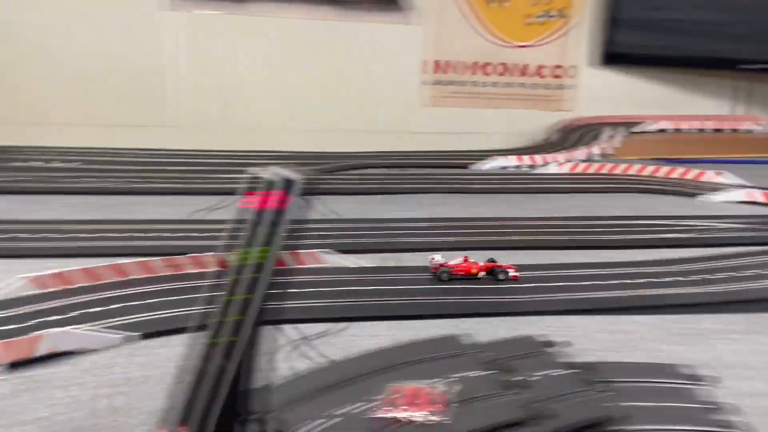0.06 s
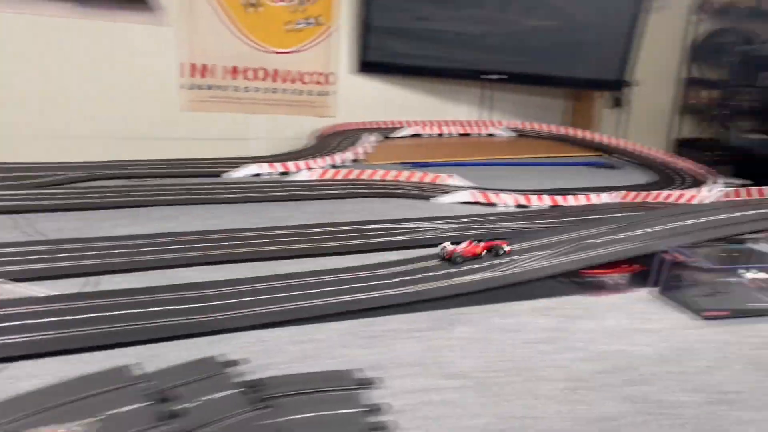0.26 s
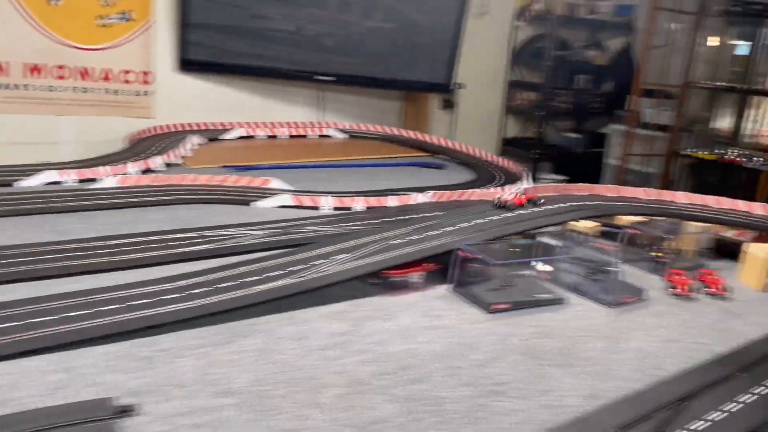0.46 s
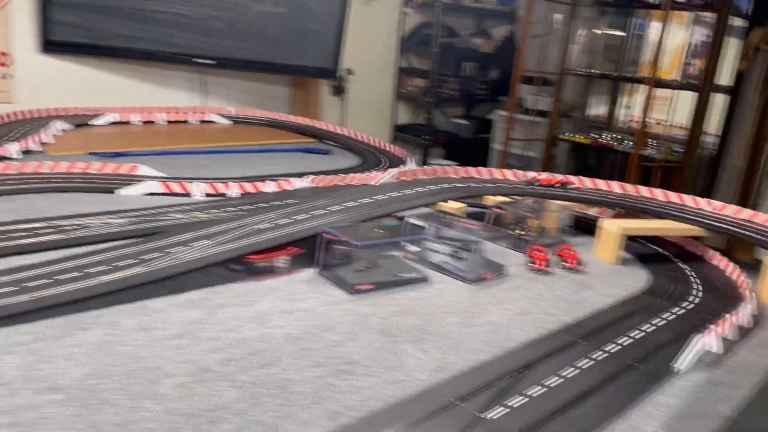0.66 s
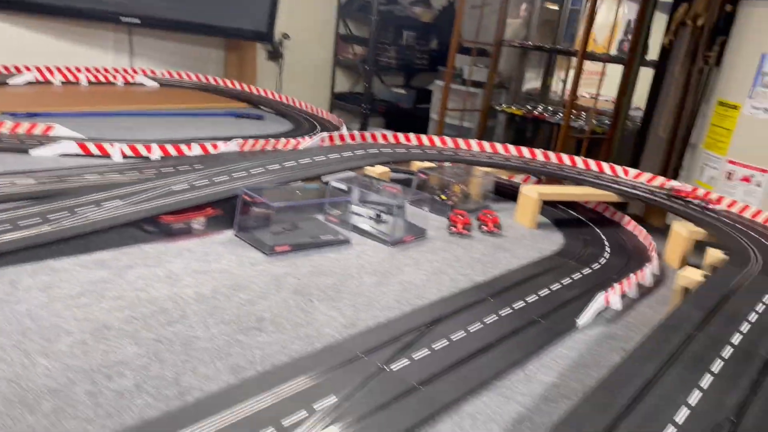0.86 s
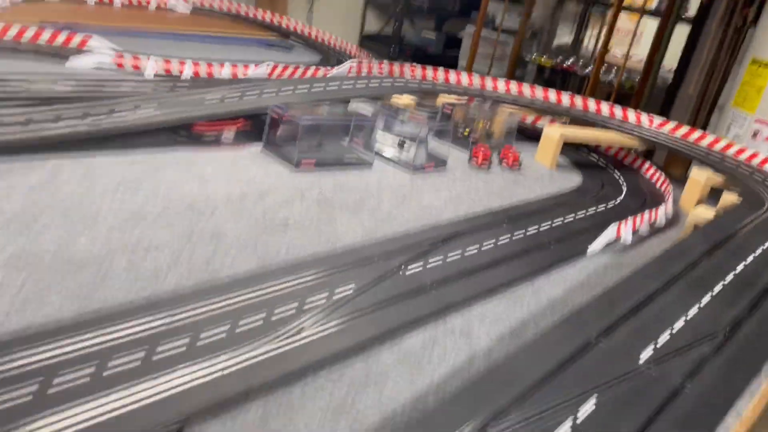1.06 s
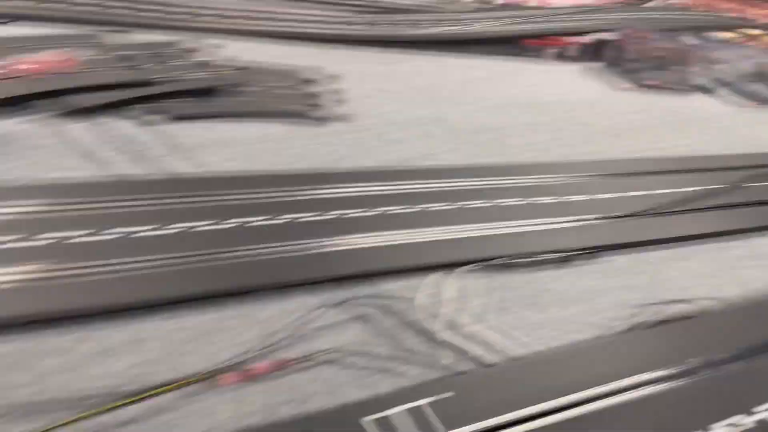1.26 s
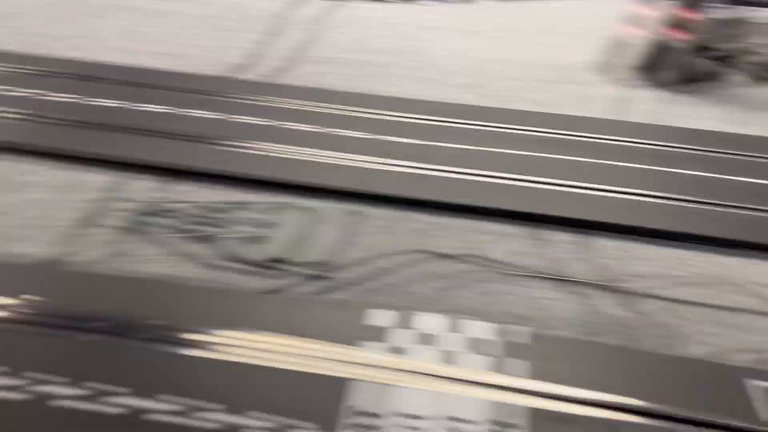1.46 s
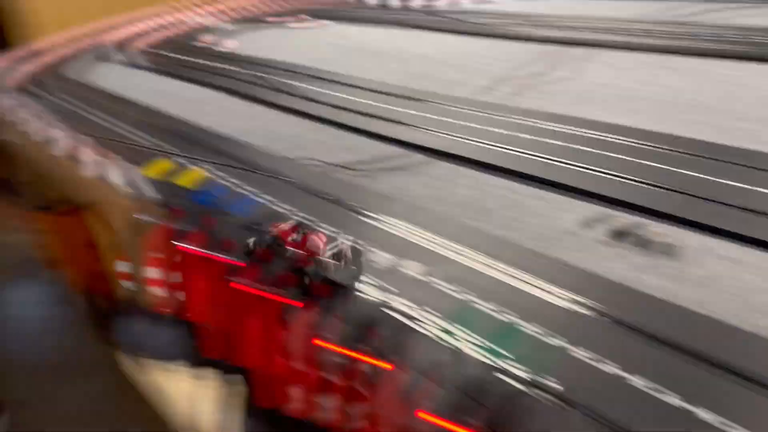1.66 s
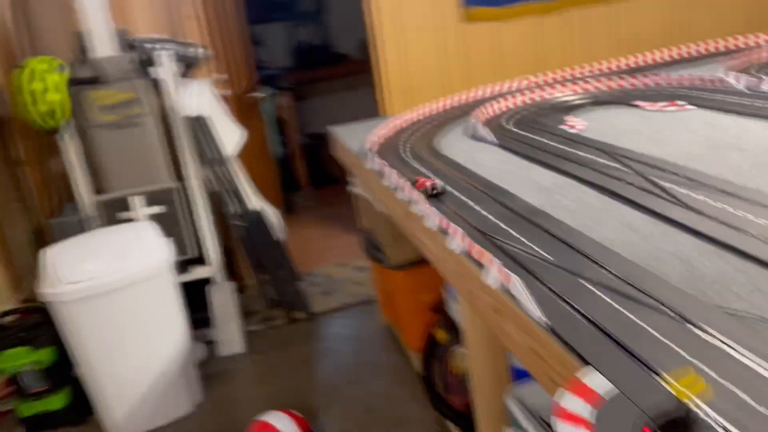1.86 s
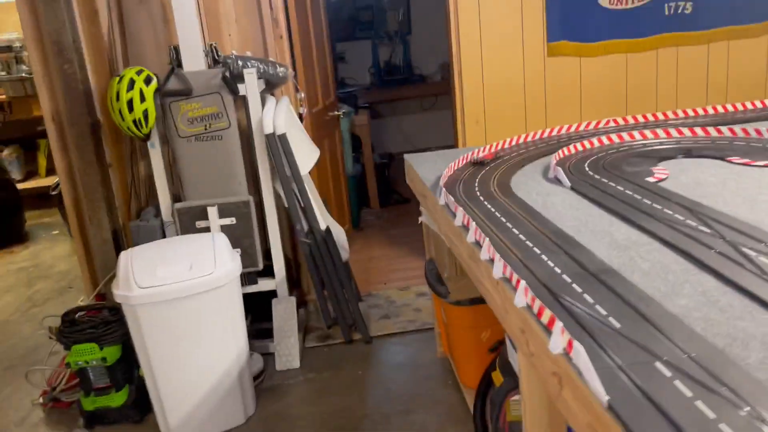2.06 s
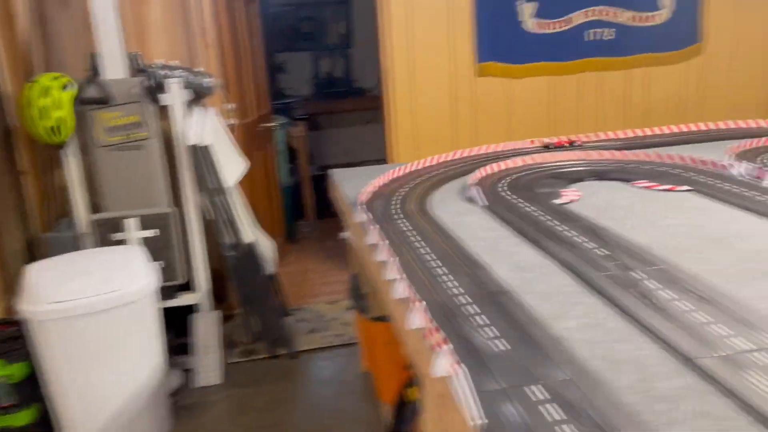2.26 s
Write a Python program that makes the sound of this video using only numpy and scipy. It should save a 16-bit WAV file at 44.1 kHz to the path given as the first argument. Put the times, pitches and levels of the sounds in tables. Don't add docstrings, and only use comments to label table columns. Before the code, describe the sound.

A slot car rattles hollow plastic track, its motor buzzing faintly and contacts hissing. A brief whirr rises at 0.3 s, with sharp joint clicks about every 0.1 s from 0.6 to 1.2. Low handling thumps begin near 1.25; the car swells into a loud, knocking pass around 1.55, with thin gear whine, then recedes by 1.9 to soft rattle, sparse clicks and low room hum until 2.3.

```python
import sys
import numpy as np
from scipy import signal
from scipy.fft import rfft, irfft
from scipy.io import wavfile

SR = 44100
rng = np.random.default_rng(int(sys.argv[2]) if len(sys.argv) > 2 else 0)


def magnitude_from_level(level_db):
    exponent = np.asarray(level_db, float) / 20
    return 10 ** exponent


def materialize(psi):
    bounded = np.clip(np.atleast_2d(psi).T, -1, 1)
    quanta = np.round(bounded * 32767).astype(np.int16)
    wavfile.write(sys.argv[1], SR, quanta)


N = 101429

# pitch in Hz, width in Hz, level in dB.
TRACK = [(349, 90, 0.5), (451, 61, 4.5), (576, 77, 4), (680, 71, 1.5), (807.7, 39, 1.5), (951, 49, 1),
         (1215, 230, -1), (1600, 83, -15.5), (2200, 320, -6), (2900, 73, -13)]


def at_hz(points, hz):
    table_hz, values = np.transpose(points)
    return np.interp(np.log(hz + 1), np.log(table_hz), values)


def rms_one(x):
    return x / np.sqrt(np.mean(x ** 2) + 1e-20)


def colour(x, points):
    hz = np.fft.rfftfreq(N, 1 / SR)
    inside = (hz > points[0][0]) * (hz < points[-1][0])
    return irfft(rfft(x) * magnitude_from_level(at_hz(points, hz)) * inside, N)


def drift(rate_hz):
    r = np.exp(-80 * np.pi * rate_hz / SR)
    chance = rng.standard_normal(N // 40 + 1002)
    slow = signal.lfilter([1], [1, -2 * r, r * r], chance)[1000:]
    return np.interp(np.arange(N) / 40, np.arange(len(slow)), rms_one(slow))


def resonate(x, hz, width_hz):
    r = np.exp(-np.pi * width_hz / SR)
    poles = [1, -2 * r * np.cos(2 * np.pi * hz / SR), r * r]
    return signal.lfilter([(1 - r * r) / 2, 0, (r * r - 1) / 2], poles, x + 1e-18)


def grains(per_s, spread_db):
    size = magnitude_from_level(spread_db * np.minimum(rng.exponential(1, N), 4))
    sign = rng.choice([-1, 1], N)
    return size * sign * (rng.random(N) < per_s / SR)


def decay(s, t60):
    t = np.arange(N) / SR - s
    return (t >= 0) * magnitude_from_level(-60 * np.maximum(t, 0) / t60)


def swell(s, span_s):
    return np.exp(-((np.arange(N) / SR - s) / span_s) ** 2)


def rings(rows, t60, soft_cycles):
    t = np.arange(N) / SR
    out = np.zeros(N)
    for s, db, hz in rows:
        envelope = decay(s, t60) * (1 - decay(s, soft_cycles / hz))
        out += magnitude_from_level(db) * envelope * np.sin(2 * np.pi * hz * (t - s))
    return out


def track(x, body, panel_hz):
    panel_db, panel_octaves, flicker_db = 8, .2, 1.5
    narrowest = .11
    out = np.zeros(N)
    for k, (hz, width_hz, db) in enumerate(body):
        nearness = np.exp(-(np.log2(hz / panel_hz) / panel_octaves) ** 2)
        share = magnitude_from_level(db + flicker_db * drift(9.8) + panel_db * nearness)
        delayed = np.roll(x, 997 * k)
        out += share * (-1) ** k * resonate(delayed, hz, max(width_hz, narrowest * hz))
    return rms_one(out)


def room_hum():
    # frequency in Hz, level in dB per Hz.
    hum_spectrum = [(32, -33), (45, 0.5), (60, -2.5), (130, -1), (170, -0.5), (240, -10.5), (340, -5),
                    (500, -12)]
    return magnitude_from_level(-42) * rms_one(colour(rng.standard_normal(N), hum_spectrum))


def room_echo(x):
    tail = rng.standard_normal(SR // 2) * decay(0.0023, .3)[:SR // 2]
    return signal.fftconvolve(x, tail / np.sqrt(np.sum(tail ** 2)))[:N]


def recorder_thumps():
    # start in seconds, peak in dB, pitch in Hz.
    thump_rows = [
        (1.238, -22, 95),
        (1.288, -20.5, 68),
        (1.36, -24, 61.5),
        (1.392, -23, 95),
        (1.575, -22.5, 103),
    ]
    return rings(thump_rows, 0.099, 1.5)


def panel_booms():
    # start in seconds, peak in dB, pitch in Hz.
    boom_rows = [(1.01, -23.5, 310), (1.2, -23.5, 347), (1.53, -15.5, 440), (1.6, -22, 400),
                 (1.685, -21, 335), (1.54, -21, 158), (1.63, -24, 176), (0.0622, -35, 1200)]
    return rings(boom_rows, 0.084, 6.4)


def chassis_knocks():
    # start in seconds, peak in dB, pitch in Hz.
    knock_rows = [(0.218, -24, 590), (0.253, -25, 513), (0.289, -20, 950), (0.294, -18, 546),
                  (0.31, -26, 950), (0.334, -24, 960), (0.365, -18, 570), (0.415, -18, 500),
                  (0.445, -20.5, 447), (0.545, -18.5, 484), (0.558, -20.5, 546), (0.61, -22, 450),
                  (0.655, -22.5, 473), (0.704, -28, 560), (0.715, -25.5, 1260), (0.727, -25, 1210),
                  (0.758, -22.5, 650), (0.88, -16, 583), (0.888, -32, 1250), (0.9, -22, 584),
                  (0.918, -19.5, 385), (0.961, -21, 655), (1.061, -19.5, 1220), (1.065, -20, 573),
                  (1.07, -19, 1210), (1.096, -14.5, 563), (1.211, -33, 1120), (1.222, -24, 1080),
                  (1.268, -20, 880), (1.321, -16, 743), (1.325, -23, 1250), (1.349, -16, 660),
                  (1.442, -17, 1310), (1.445, -11.5, 860), (1.458, -13, 590), (1.497, -12, 790),
                  (1.508, -13, 590), (1.531, -10, 770), (1.543, -4, 670), (1.553, -20, 980),
                  (1.562, -6.5, 1100), (1.568, -11, 580), (1.569, -15, 1250), (1.58, -5.5, 712),
                  (1.613, -11.5, 840), (1.64, -19, 760), (1.67, -18, 630), (1.683, -14.5, 547),
                  (1.697, -14, 686), (1.765, -24, 845), (1.778, -20, 570), (1.787, -21, 600),
                  (1.816, -28, 1200), (1.928, -24, 780), (2.033, -23, 740), (2.073, -23, 640)]
    return magnitude_from_level(-0.5) * rings(knock_rows, 0.02, 2.6)


def shell_taps():
    # start in seconds, peak in dB, pitch in Hz.
    tap_rows = [(.281, -22, 1400), (.305, -27, 5940), (1.16, -26, 6240), (.715, -25, 3950),
                (.973, -33, 4290), (1.075, -20, 1410), (1.206, -30, 4220), (1.482, -12.5, 1600),
                (1.483, -27, 4570), (1.498, -16.5, 2560), (1.511, -21, 2190), (1.523, -15, 2200),
                (1.539, -12.5, 2060), (1.569, -22, 3210), (1.579, -14, 1410), (1.587, -21, 2130),
                (1.606, -25, 3900), (1.616, -22, 1490), (1.665, -26, 4530), (1.677, -27, 3400),
                (1.682, -23.5, 3440)]
    return magnitude_from_level(1.5) * rings(tap_rows, 0.013, 4.1)


def joints():
    # start in seconds, peak in dB, body relative in dB,
    # tilt in dB per octave, tail relative in dB.
    strikes = [(0.3068, -15.5, -9.5, -1.5, -8.5), (0.612, -22.5, -11, -1, -8.5),
               (0.7162, -15, -18, 1.5, -7.5), (0.808, -17.5, -12, 1.5, -6.5), (0.89, -19, -12, 0.5, -9),
               (0.9736, -18, -9.5, 2, -8), (1.0621, -14, -3, -0.5, -7.5), (1.159, -21.5, -7, 1, -5),
               (1.2045, -30.5, 3.5, -3, -6.5), (1.268, -32, 7.5, -5, -23), (1.4146, -25, -15, -5, -23),
               (1.6653, -25, 1, 2, -18), (1.7474, -29.5, 2, -7, 1), (1.834, -22.5, -3.5, -1, -5),
               (2.0507, -32.5, -2, -4, -3), (2.2632, -31, -7, -6.5, -2)]
    # frequency in Hz, level in dB per Hz.
    crack = [(1000, -21), (2500, -5.5), (3600, -2.5), (6000, -5.5), (10000, 0.5), (13000, -4),
             (16600, -18.5)]
    crack_t60, tail_t60, body_t60 = 0.0052, 0.16, 0.1
    out = np.zeros(N)
    body = track(rng.standard_normal(N), TRACK, 1030)
    noise = rng.standard_normal(N)
    for s, db, body_db, tilt_db, tail_db in strikes:
        tilted = [(hz, level + tilt_db * np.log2(hz / 7000)) for hz, level in crack]
        bright = rms_one(colour(noise, tilted))
        click = bright * (decay(s, crack_t60) + magnitude_from_level(tail_db) * decay(s, tail_t60))
        answer = magnitude_from_level(body_db) * body * decay(s + 0.00179, body_t60)
        out += magnitude_from_level(db - 5) * (click + answer)
    return out


def braids():
    # frequency in Hz, level in dB per Hz.
    hiss_spectrum = [(2500, -20), (3500, -0.5), (5900, -5), (8700, 2.5), (10200, -6.5), (11500, -5),
                     (13700, -13), (16200, -23)]
    x = rng.standard_normal(N) + magnitude_from_level(-8) * rms_one(grains(300, 4))
    patches = np.zeros(N)
    for k, hz in enumerate(2600 * 2 ** np.arange(0, 2.8, 1 / 3)):
        flicker = magnitude_from_level(.7 * drift(6) + 1.2 * drift(40))
        patches += (-1) ** k * flicker * resonate(x, hz, hz / 4)
    return rms_one(colour(patches * magnitude_from_level(0.85 * drift(43)), hiss_spectrum))


def gear_whine():
    # centre in seconds, span in seconds, pitch in Hz, level in dB.
    whine_rows = [(.92, .07, 560, -42), (1.3, .015, 2500, -46), (1.39, .03, 2280, -43),
                  (1.415, .02, 3130, -44), (1.45, .02, 4050, -46), (1.565, .02, 4965, -43),
                  (1.605, .018, 4965, -39), (1.60, .03, 2977, -40)]
    out = np.zeros(N)
    for s, span_s, hz, db in whine_rows:
        cycles = hz * np.cumsum(1 + 0.00813 * drift(53)) / SR
        out += magnitude_from_level(db + 5.5) * np.sin(2 * np.pi * cycles) * swell(s, span_s)
    return out


def turning_sizzle(x):
    # centre in seconds, span in seconds, pitch in Hz, width in Hz, level in dB.
    swell_rows = [
        (0.3, 0.063, 1070, 440, -44),
        (1.417, 0.07, 2990, 850, -43.5),
        (1.55, 0.048, 1580, 760, -34),
        (-1.2, -0.65, 9000, 800, -44),
    ]
    out = np.zeros(N)
    for s, span_s, hz, width_hz, db in swell_rows:
        band = resonate(resonate(x, hz, width_hz), hz, 2 * width_hz)
        out += magnitude_from_level(db) * rms_one(band) * swell(s, span_s)
    return out


def car():
    # time in seconds, rattle in dB, motor in dB, braid hiss in dB,
    # pitch of the loudest track panel in Hz, pitch of the motor body in Hz.
    lap = [(0, -36.5, -50.5, -50, 680, 1640), (.13, -36, -47, -47.5, 520, 2400),
           (.26, -32, -35, -43.5, 660, 1370), (.31, -30, -36, -41.5, 920, 1520),
           (.43, -35, -40.5, -45.5, 456, 1440), (.62, -35.5, -48, -47.5, 560, 1530),
           (.9, -35, -39.5, -44.5, 580, 1420), (1.03, -33.5, -56, -47, 560, 1810),
           (1.08, -31, -35.5, -37, 680, 1460), (1.15, -35.5, -42, -42.5, 614, 1760),
           (1.3, -32.5, -38.5, -40, 780, 2660), (1.411, -28, -38, -39, 630, 2900),
           (1.46, -25.5, -30, -38, 830, 2870), (1.528, -21.5, -24.5, -32, 630, 2200),
           (1.58, -21, -27.5, -32, 990, 1980), (1.69, -28, -32, -36, 630, 1600),
           (1.88, -34.5, -44, -44, 670, 1600), (2.3, -36, -43, -45, 750, 1810)]
    # pitch in Hz, width in Hz, level in dB.
    shell = [(1310, 180, 5), (1600, 243, 7.5), (1970, 68, 3), (2236, 107, 5), (2570, 97, 0.5),
             (3030, 180, 0), (4100, 500, -22.5)]
    s, *columns = np.transpose(lap)
    t = np.arange(N) / SR
    rattle_db, motor_db, hiss_db, panel_hz, motor_hz = [np.interp(t, s, c) for c in columns]
    rattle = track(grains(2500 * magnitude_from_level(2 * drift(30)), 2), TRACK, panel_hz)
    motor = track(grains(2500, 3.14), shell, motor_hz)
    hiss = braids()
    out = turning_sizzle(rattle + motor + hiss) + gear_whine()
    out += magnitude_from_level(rattle_db - 3) * rattle
    out += magnitude_from_level(motor_db - 1) * motor
    out += magnitude_from_level(hiss_db + 3.5) * hiss
    return out


def scatter(x):
    z = signal.stft(x, nperseg=256)[2]
    z = z * np.exp(2j * np.pi * rng.random(z.shape))
    return signal.istft(z, nperseg=256)[1][:N] * np.sqrt(2)


def scene():
    # frequency in Hz, level in dB.
    unlike = [(150, -25), (250, -13), (500, -6.5), (1200, -7.5), (3000, -5), (6000, -6), (7500, -8.5),
              (9000, -18), (12500, -15), (14500, -9), (16600, -2)]
    near = car() + joints() + chassis_knocks() + panel_booms() + shell_taps()
    dull = signal.lfilter([.5], [1, -.5], near)
    near = near + magnitude_from_level(-11) * room_echo(dull)
    thumps = recorder_thumps()
    mid = near + room_hum() + thumps
    side = colour(scatter(near), unlike)
    side += magnitude_from_level(-12) * room_hum()
    side += magnitude_from_level(-10) * np.roll(thumps, SR // 330)
    return np.array([mid + side, mid - side])


def two_ports(dry):
    # frequency in Hz, phase in radians.
    ports = [(10, 0), (1290, -.3), (1720, -1.4), (2760, .9), (3790, -.05), (5000, .5), (6630, -1.1),
             (7600, -3.05), (8500, -3.25), (11000, -6.2), (12400, -6.4), (13800, -9.3), (16500, -9.55)]
    # frequency in Hz, level in dB.
    lean = [(300, -.4), (700, -.7), (1400, 1.6), (3000, 2.7), (5500, 2.2), (7300, 0)]
    hz = np.fft.rfftfreq(N, 1 / SR)
    port_hz, rad = np.transpose(ports)
    turn = np.exp(.5j * np.interp(hz, port_hz, rad)) * magnitude_from_level(at_hz(lean, hz) / 2)
    return irfft(rfft(dry) * np.array([turn, 1 / turn]), N)


def drop_gaps(x, gaps):
    # time in seconds, kept share in dB.
    sharp = [(.3062, -4), (.7162, -9), (.809, -5), (.889, -13), (.9745, -15), (1.0624, -1), (1.1593, 0),
             (1.8331, 0)]
    click_s, step_hz = .006, 258
    t = np.arange(N) / SR
    keep = sum(magnitude_from_level(db) * np.exp(-((t - s - click_s / 4) / click_s * 2) ** 4) for s, db in sharp)
    hz, frame_s, z = signal.stft(x, SR, nperseg=2048)
    hz = hz[:, None]
    for low, high in gaps:
        wander = np.repeat(rng.normal(0, .7, (2, len(frame_s))), 2, axis=1)[:, :len(frame_s)]
        low_step, high_step = step_hz * np.round(wander)
        bottom = low + low_step / (1 + (low < 9000))
        z[(hz > bottom) & (hz < high + high_step)] = 0
    thin = signal.istft(z, SR, nperseg=2048)[1][:N]
    return thin + keep * (x - thin)


def low_pass(x):
    return signal.sosfilt(signal.butter(12, 16650, fs=SR, output="sos"), x)


def record(dry):
    # lower edge in Hz, upper edge in Hz.
    mid_gaps = [(7700, 8480), (13800, 22050)]
    side_gaps = [(10950, 12500), (15850, 22050)]
    left, right = two_ports(dry)
    mid = drop_gaps((left + right) / 2, mid_gaps)
    side = drop_gaps((left - right) / 2, side_gaps)
    return low_pass(np.array([mid + side, mid - side]))


dry = scene()
out = record(dry)
materialize(out)
```